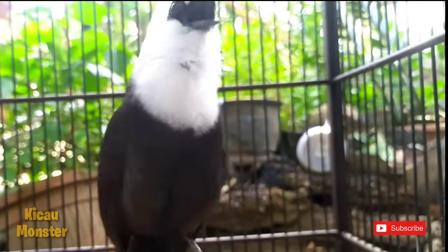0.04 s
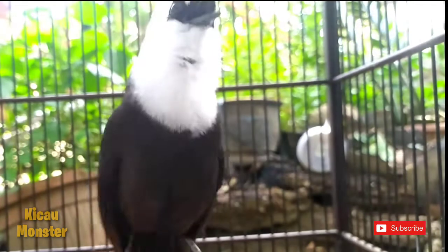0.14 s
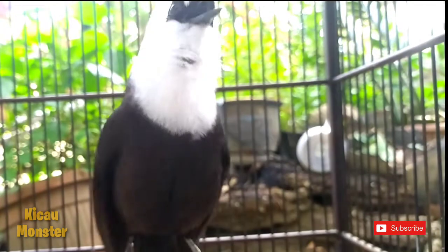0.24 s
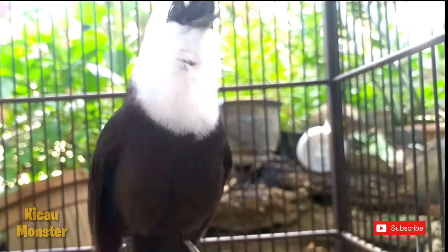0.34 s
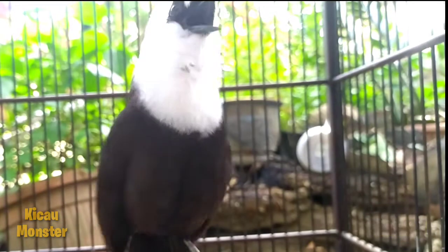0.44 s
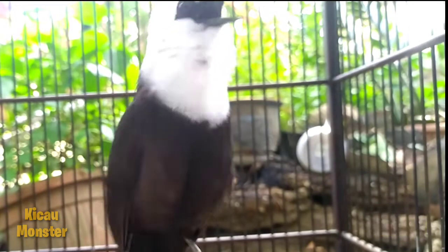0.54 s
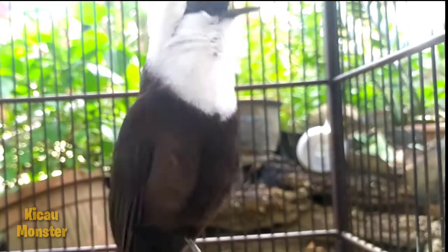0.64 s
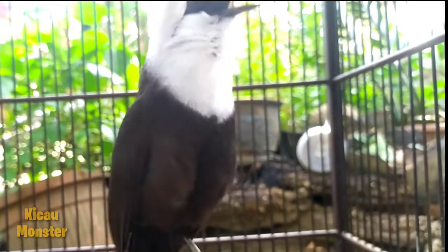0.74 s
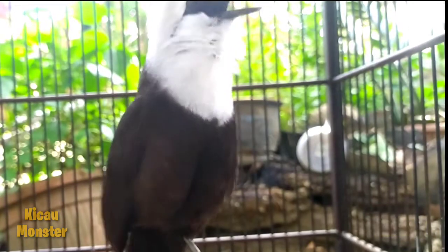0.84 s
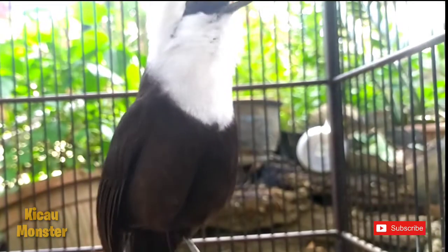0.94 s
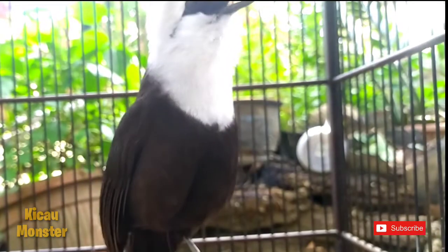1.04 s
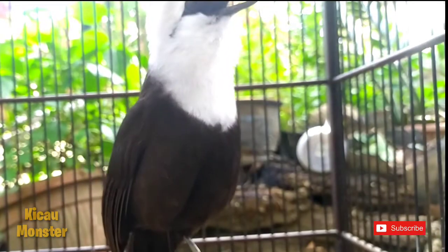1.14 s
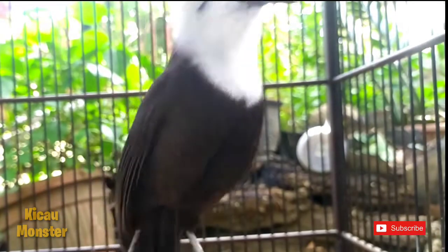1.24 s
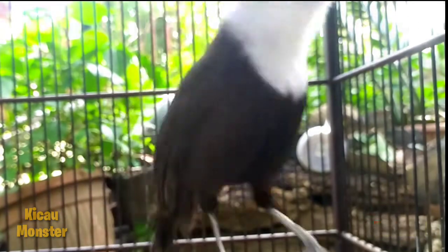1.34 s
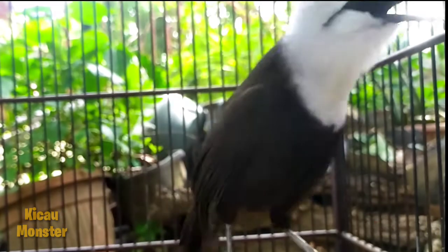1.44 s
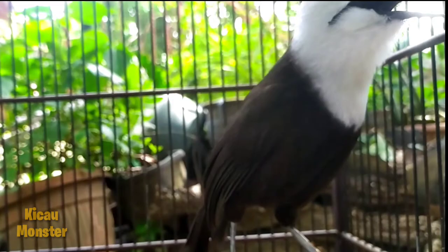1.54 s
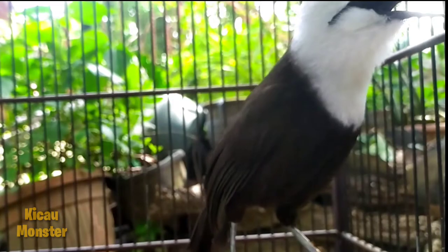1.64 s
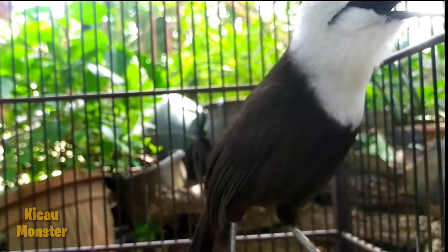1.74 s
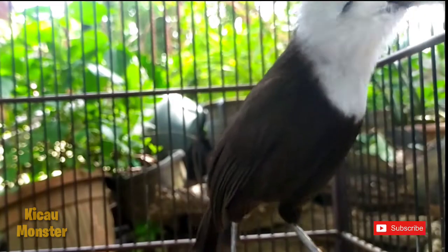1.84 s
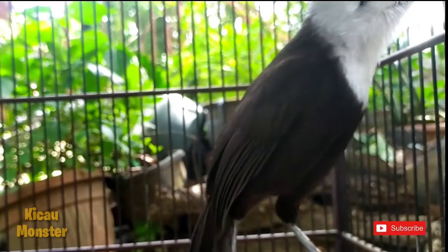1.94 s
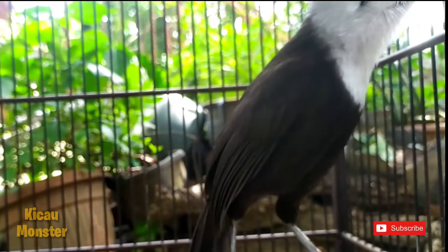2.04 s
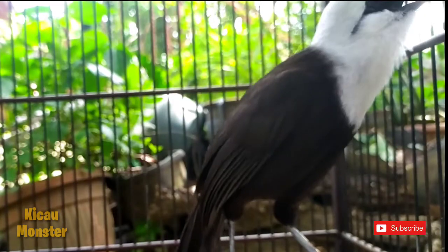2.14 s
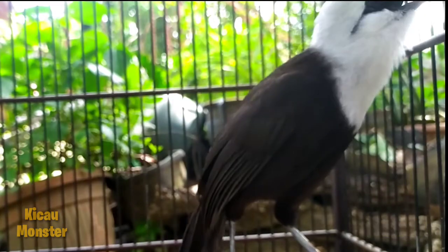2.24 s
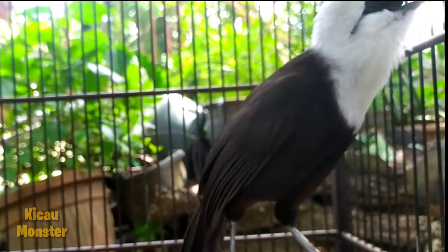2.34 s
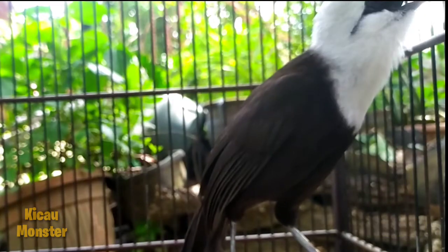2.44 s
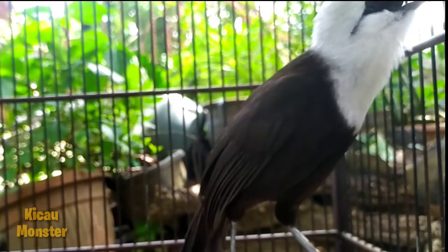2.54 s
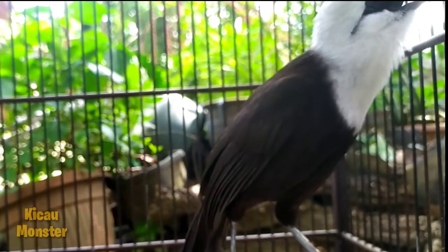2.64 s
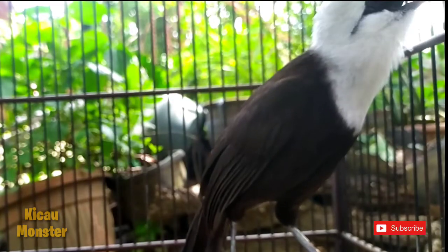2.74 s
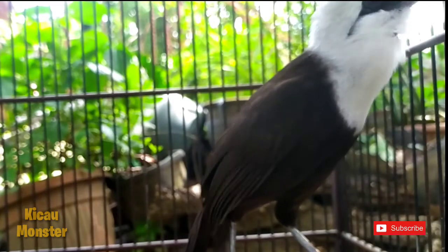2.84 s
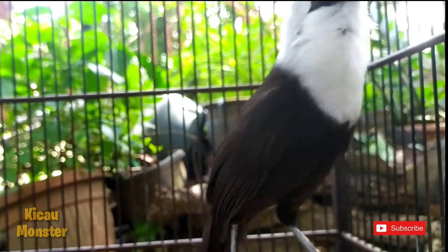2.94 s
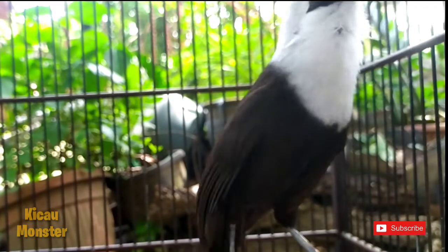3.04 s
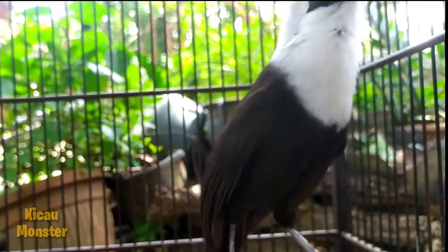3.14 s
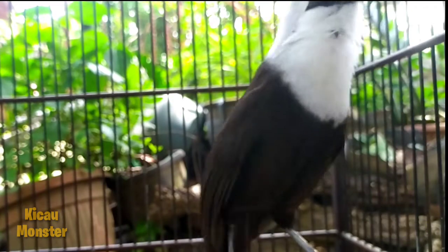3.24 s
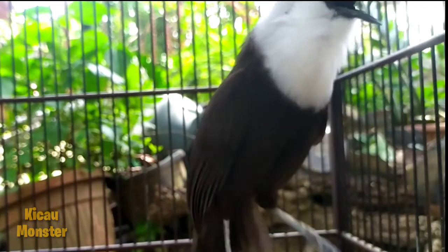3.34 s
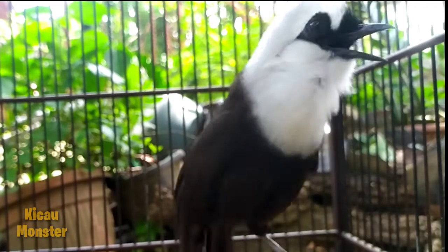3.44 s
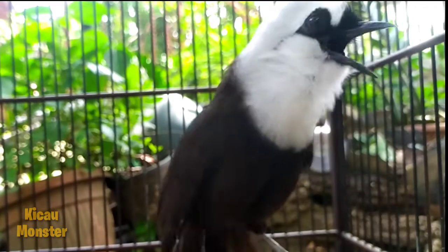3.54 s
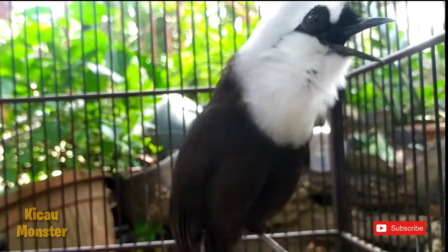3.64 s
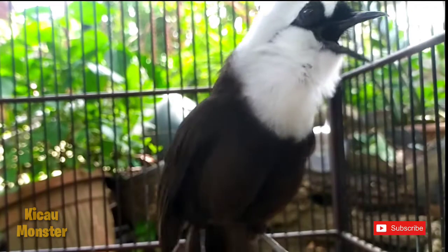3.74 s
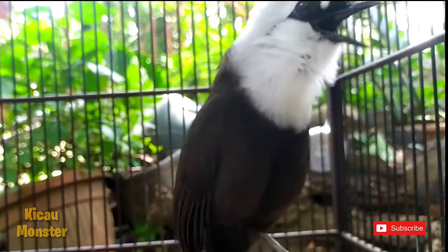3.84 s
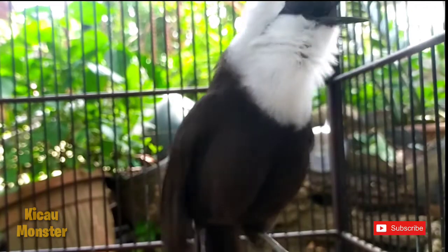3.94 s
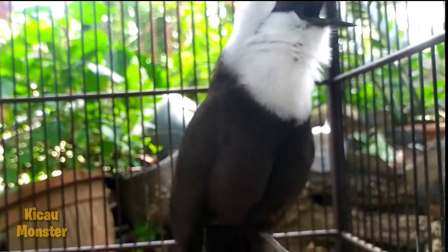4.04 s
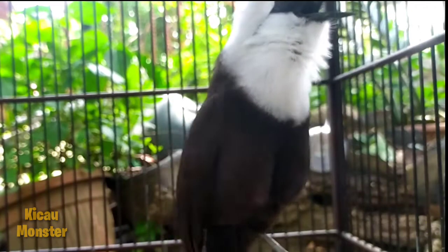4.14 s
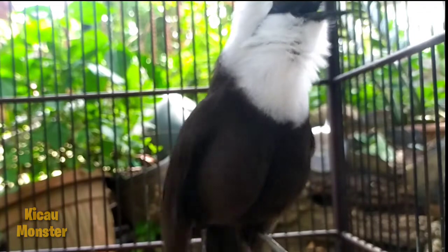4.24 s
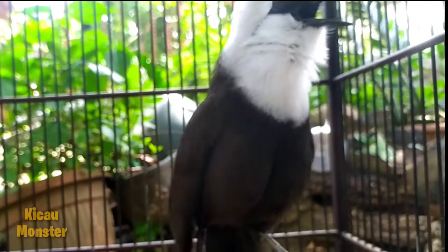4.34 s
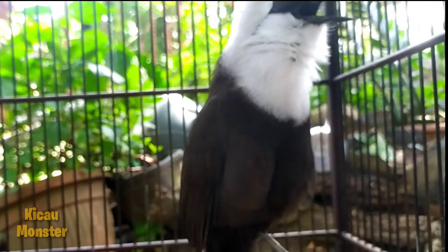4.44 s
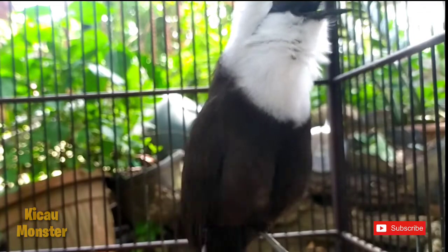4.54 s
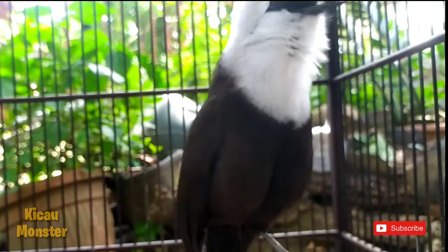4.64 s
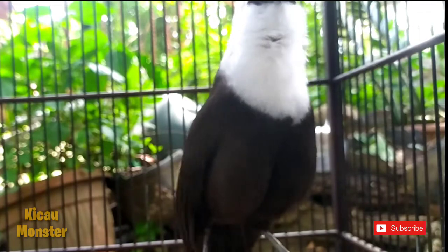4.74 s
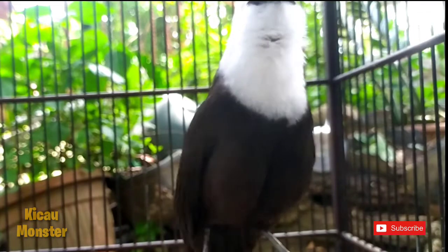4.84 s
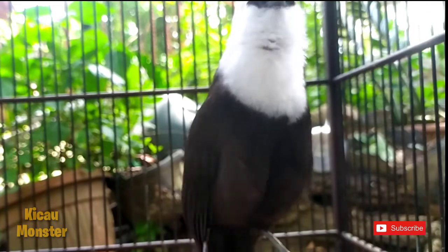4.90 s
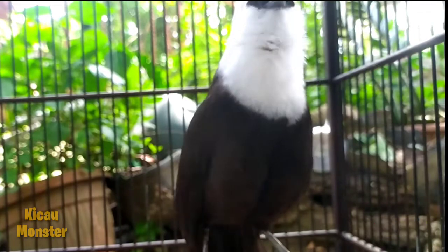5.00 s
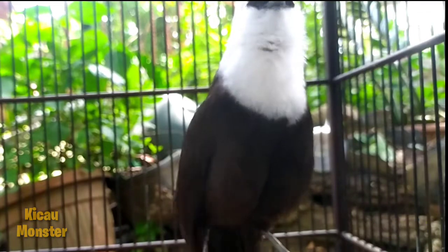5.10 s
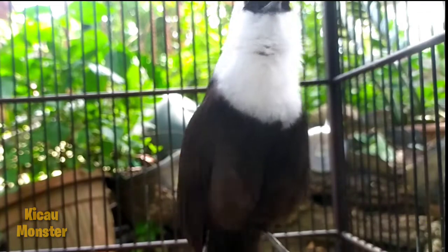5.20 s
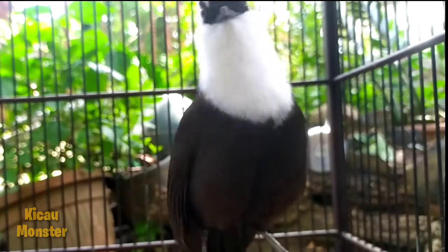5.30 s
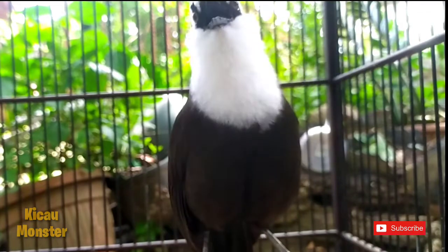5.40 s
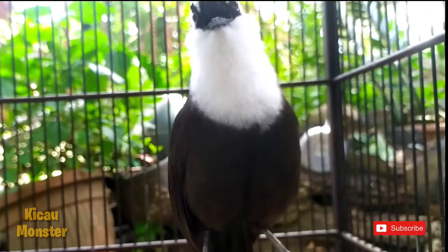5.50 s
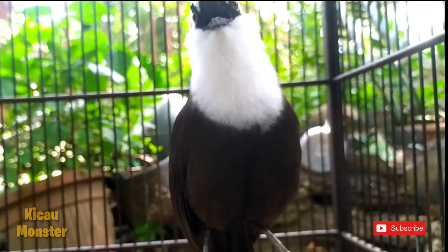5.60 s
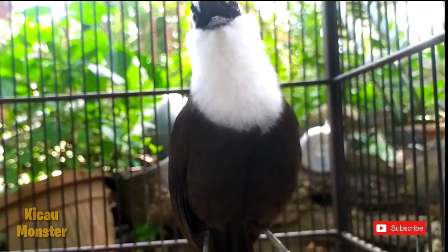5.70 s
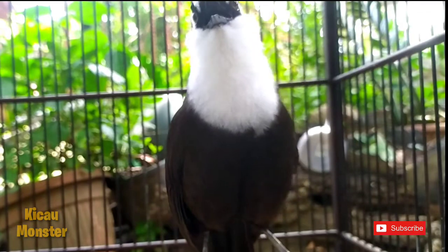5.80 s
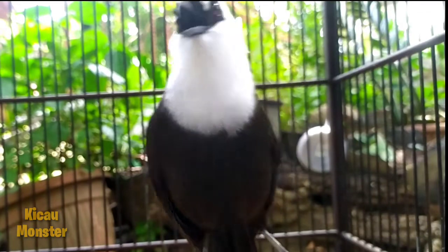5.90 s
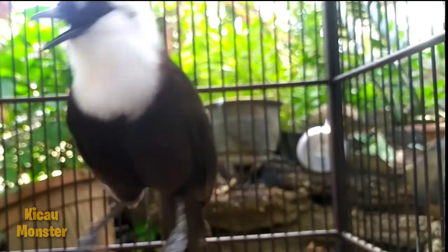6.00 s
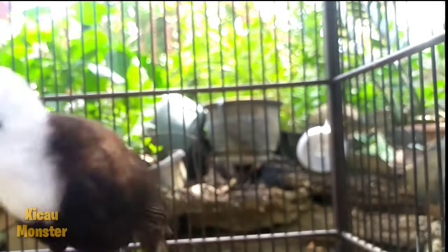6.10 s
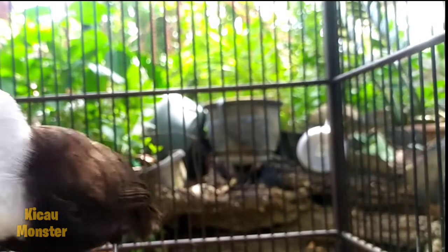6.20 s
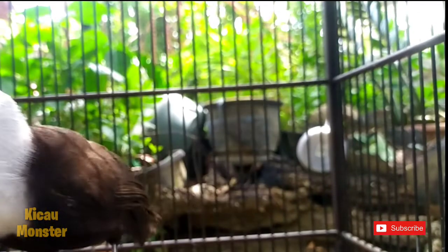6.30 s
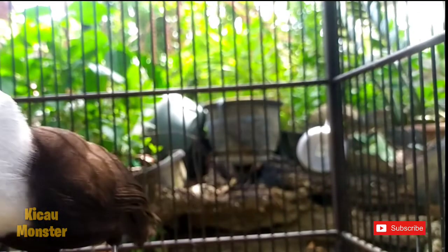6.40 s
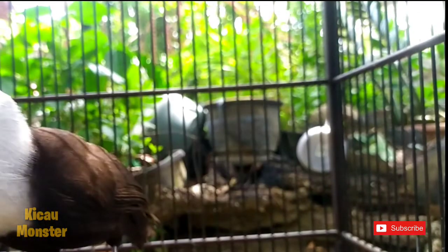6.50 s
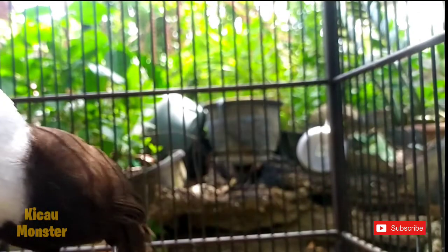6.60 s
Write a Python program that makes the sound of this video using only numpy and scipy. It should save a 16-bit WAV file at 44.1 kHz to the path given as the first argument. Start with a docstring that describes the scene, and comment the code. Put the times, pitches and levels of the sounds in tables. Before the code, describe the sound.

A caged songbird very close chatters in two loud, harsh rattling runs, with quiet chuckles between, faint garden birds behind, and a final hoarse squawk.

```python
"""In a garden, a caged laughingthrush chatters very close to two microphones: two rattling runs of harsh
arched notes, soft chuckles and a drawn-out note between them, and a squawk after claws tick on the perch.
Its voice is a stack of partials plus pulsed air noise, both coloured by how wide the beak opens. Cage bars,
near surfaces and walls ring after it. Smaller birds, as gliding tones, chirp and whistle farther off, over a
bed of coloured noise and a motor's hum. Loud notes overload the microphones and a limiter holds the peaks."""
import sys
import numpy as np
from scipy import signal
from scipy.fft import rfft, irfft, next_fast_len
from scipy.io import wavfile
from scipy.ndimage import uniform_filter1d, minimum_filter1d, map_coordinates

SR = 44100
rng = np.random.default_rng(int(sys.argv[2]) if len(sys.argv) > 2 else 0)


def wav_out(sig):
    """Save sig, one row per channel (or a flat mono array), as 16-bit PCM at SR to the path in sys.argv[1]."""
    wavfile.write(sys.argv[1], SR, np.round(np.clip(np.atleast_2d(sig).T, -1, 1) * 32767).astype(np.int16))


N = 293706
TIME = np.arange(N) / SR
TOP_HZ = 15500  # where the microphones' band ends

# thrush chatter, each note placed by the end of its attack: (time [s], level before the beak colour [dB])
CHATTER_NOTES = [(.013, 2), (.087, 2), (.166, 2.5), (.245, 1), (.336, 1), (.416, 1), (.498, .5), (.584, 0),
                 (.681, -.5), (.774, -1), (.897, -1), (2.508, -40), (2.564, -41), (2.617, -38),
                 (2.685, -36), (2.765, -41), (2.849, -38), (3.139, -7.5), (3.247, -4), (3.327, -3),
                 (3.392, -1.5), (3.459, -2), (3.527, -2), (3.598, -1.5), (3.666, -1), (3.736, 0),
                 (3.807, 0), (3.878, 0), (3.947, 0), (4.020, -.5), (4.092, .5), (4.165, 0), (4.239, .5),
                 (4.319, .5), (4.399, .5), (4.481, -.5), (4.567, .5), (4.656, .5), (4.748, .5), (4.849, .5),
                 (4.951, -.5), (5.067, -.5), (5.166, 0), (5.258, -1)]
# how the bird faces the microphones: (time [s], left lag [ms], left minus right [dB], treble gain [dB])
FACING = [(0, 0.12, 0.44, .5), (.9, 0.12, -2.3, 0), (2.85, 0.12, -3, 1), (2.9, 0.22, -7.5, -0.5),
          (3.15, 0.24, -3, 1.5), (3.6, .23, -3.2, 1.5), (4.3, .23, -6.5, 2), (4.8, .22, -5.3, -1),
          (5.3, .17, 4.5, -2.5), (6.62, -0.09, 2.5, -9.5)]
# partials of the call as heard, a dominant second harmonic with weaker ones above and below:
# (multiple of the pitch [-], level before the beak colour [dB])
PARTIALS = [(1, -22), (2, -1.5), (3, -25), (4, -21), (5, -25.5), (6, -16), (7, -21), (8, -25.5),
            (10, -23.5), (11, -29.5)]
# overall colour of the loud open-beaked notes, brightest near 1.9, 5.7 and 10 kHz:
# (frequency [Hz], gain [dB])
WIDE_COLOUR = [(100, -37.5), (450, -31), (900, -10), (1300, -11.5), (1850, -1.5), (2450, -3.5), (3100, -10),
               (4200, -21), (5650, -2.5), (6600, -11), (7600, -10), (8300, -19.5), (9400, -10), (10600, -5),
               (12200, -18.5), (14000, -14), (16000, -21)]
# overall colour of the notes with the beak half closed: (frequency [Hz], gain [dB])
NARROW_COLOUR = [(100, -44.5), (450, -20), (780, -1.5), (960, -5.5), (1250, -7), (1700, 1.5), (2400, -5),
                 (3200, -5.5), (4000, -20.5), (5500, -31.5), (6400, -2.5), (7300, 5.5), (8400, -19),
                 (11000, -8), (13800, -11.5), (16000, -18.5)]
# beak opening, half closed to wide open: (time [s], opening [0-1])
GAPE = [(.95, 1), (2.45, 0), (3.15, 0), (3.3, 0.2), (3.45, 1), (4.5, 0.98)]
# claws on the perch: (time [s], level before the click trim [dB])
CLAW_TICKS = [(2.3504, -39), (6.0292, -36.5), (6.1974, -28.5), (6.2432, -40)]
# colour of a claw tick: (frequency [Hz], relative level [dB per Hz])
CLAW_COLOUR = [(500, -17.5), (2500, -9), (9000, 3), (15000, -14)]
# a small bird's falling chips: (time [s], level before echoes [dB])
CHIPS = [(1.175, -50), (1.323, -50), (6.174, -54), (6.563, -51)]
# glide of one chip: (length [s], start [Hz], end [Hz])
CHIP_GLIDE = (.02, 4800, 2900)
# another bird's rising tweets: (time [s], level before echoes [dB])
TWEETS = [(2.104, -64), (2.208, -58), (2.291, -50.5), (2.428, -51), (2.580, -57)]
# glide of one tweet: (length [s], start [Hz], end [Hz])
TWEET_GLIDE = (.026, 3200, 5600)
# a thin high slur in two parts: (time [s], length [s], start [Hz], end [Hz], level before echoes [dB])
SLUR = [(5.47, .06, 7610, 6510, -51), (5.52, .06, 6110, 4300, -64)]
# far whistles: (time [s], length [s], start [Hz], end [Hz], level before flutter and mix [dB])
WHISTLES = [(1.25, .36, 3750, 3730, -70), (2.15, .25, 1531, 1313, -61), (6.16, .36, 1255, 1390, -51.5),
            (6.46, .14, 1415, 1404, -43.5)]
# what comes back through the foliage: (frequency [Hz], gain [dB])
LEAVES = [(500, 0), (1400, -6), (1720, -6), (1920, 0), (2800, -3), (4200, -3), (5700, 1), (8000, -1),
          (15000, -2)]
# decay of the walls' tail: (frequency [Hz], time to fall 60 dB [s])
WALL_DECAY = [(200, .4), (1500, .4), (1900, 0.51), (2400, 0.45), (4500, 0.55), (5700, .65), (7000, 0.55),
              (10500, 0.59), (16000, .35)]
# colour of the garden bed: (frequency [Hz], relative level [dB per Hz])
GARDEN_COLOUR = [(15, -53), (25, -27), (44, -8), (122, -4.5), (240, -15.5), (267, -20), (305, -17),
                 (378, -21.5), (666, -24.5), (741, -29), (871, -23), (1490, -30), (3720, -29),
                 (5580, -31.5), (15500, -42)]
# stereo likeness of the garden bed: (frequency [Hz], left-right correlation [-1 to 1])
GARDEN_LIKENESS = [(60, 0.64), (240, 0.95), (950, 0.29), (3770, -0.7), (15000, 0.25)]
# a far motor: (frequency [Hz], level [dB])
MOTOR_HUM = [(59, -63), (301, -67), (667, -74)]

# one chatter note
NOTE_HZ, USUAL_GAP_S = 956, .08  # base pitch of a full note at the usual tempo
TEMPO_OCT, TEMPO_RASP_DB = .125, 4  # a doubled tempo raises pitch and rasp by this much
SOFT_OCT_PER_DB = .0012  # soft notes are sung lower
ATTACK_S, HOLD_S, RELEASE_S = .012, .026, .0205  # air pressure of one note
CREST_S, FLICK_S = .02, .0035  # time from end of attack to the top of the pitch arch, and half its width
RISE_OCT, FLICK_OCT, FALL_OCT_PER_S = .1, .105, 25  # slow climb, flick at the crest, dive
CLEAN_DB, BREAK_DB, CREST_DIP_DB = -5.5, 7, 3.5  # rasp of the climb, its jump at the crest, level lost there
# air pressure in every call
FADE_DB, RELEASE_BEND = 40, .95  # depth of attack and release; curve of the release
SLUMP_OCT_PER_DB, RASP_PER_DB = .011, .53  # as the pressure fails, the voice goes flat and hoarse
MOST_RASP_DB = 14  # the most hoarseness that failing pressure adds


def thrush(edge_hz=3500):
    """The bird's treble follows where its beak points."""
    voice = syrinx()
    treble = filtered(voice, lambda hz: 1 - 1 / (1 + (hz / edge_hz) ** 6))
    treble_db = curves(FACING, TIME)[2]
    return voice + (amp(treble_db) - 1) * treble


def syrinx(jitter=.02, shimmer=.15, air_db=-18, grain_db=2, flutter_db=4.2):
    """Harmonics and turbulent air, coloured by the beak; harsh moments also shake pitch and level."""
    pitch, level_db, rasp_db = phrases()
    gape = curves(GAPE, TIME)[0]
    rough = amp(rasp_db / 2)
    shaken_pitch = pitch * (1 + jitter * rough * wobble(1400, N))
    phase = 2 * np.pi * np.cumsum(shaken_pitch) / SR

    partials = [amp(db) * beak_colour(k * pitch, gape) * np.sin(k * phase) for k, db in PARTIALS]
    flutter = unit(amp(flutter_db * wobble(600, N)))
    tone = sum(partials[:2]) + sum(partials[2:]) * flutter  # the upper partials come and go
    tone = np.sqrt(2) * tone * (1 + shimmer * rough * wobble(800, N))

    air = np.sqrt(gape) * noise(WIDE_COLOUR) + np.sqrt(1 - gape) * noise(NARROW_COLOUR)
    # air passes once a cycle, in uneven bursts
    puffs = unit((1 + .35 * np.cos(phase)) * amp(grain_db * wobble(450, N)))
    return amp(level_db) * (tone + amp(air_db + rasp_db) * puffs * air)


def beak_colour(hz, gape):
    """Gain of the call's colour between beak half closed (0) and wide open (1)."""
    return amp(gape * along(WIDE_COLOUR, hz) + (1 - gape) * along(NARROW_COLOUR, hz))


def phrases():
    """Pitch [Hz], level [dB] and rasp [dB] at every sample; where calls overlap the louder takes over."""
    controls = np.tile([[900.], [-120.], [0.]], N)  # silent between calls
    for rows in chatter() + [drawl(), squawk()]:
        span = slice(*np.searchsorted(TIME, rows[[0, -1], 0]))
        call = np.array(curves(rows, TIME[span]))
        louder = call[1] > controls[1, span]
        controls[:, span] = np.where(louder, call, controls[:, span])
    return controls


def chatter(vary=.2, vary_db=1.2, drift_oct=.016):
    """Each note climbs cleanly, flicks up, breaks and dives; quick ones are higher and harsher, soft arch less."""
    gaps = np.diff([s for s, db in CHATTER_NOTES])
    nearest_gap = np.minimum(np.r_[gaps[0], gaps], np.r_[gaps, gaps[-1]])
    tempos = np.log2(USUAL_GAP_S / nearest_gap)  # in doublings

    t, pressure_db = push(ATTACK_S, HOLD_S, RELEASE_S)
    flick = np.exp(-((t - CREST_S) / FLICK_S) ** 2)
    broken = np.where(t < CREST_S, flick, 1)
    climb = RISE_OCT * (np.clip(t / CREST_S, 0, 1) - .5)
    dive = FALL_OCT_PER_S * np.maximum(t - CREST_S, 0)
    arch = climb + FLICK_OCT * flick - dive

    calls = []
    for (s, db), tempo in zip(CHATTER_NOTES, tempos):
        bend, grit, drift = (wobble(160, len(t)) for _ in range(3))
        depth = np.interp(db, [-30, -6], [.7, 1]) * (1 + vary * bend)
        octaves = TEMPO_OCT * tempo + SOFT_OCT_PER_DB * db + depth * arch + drift_oct * drift
        rasp_db = CLEAN_DB + TEMPO_RASP_DB * tempo + BREAK_DB * broken + vary_db * grit
        level_db = db - CREST_DIP_DB * flick
        calls.append(voiced(s + t, pressure_db, NOTE_HZ * 2 ** octaves, level_db, rasp_db))
    return calls


def drawl(s=2.913, hz=832, db=-12, attack=.034, hold=.11, release=.021,
          sag_db=4.5, sag_oct=.105, rasp_db=-3, break_db=5, swell_db=3):
    """One long note that sags in the middle, then swells and turns hoarse."""
    t, pressure_db = push(attack, hold, release)
    u = np.clip(t / hold, 0, 1)
    sag = 1 - np.cos(np.pi * u) ** 6
    level_db = db + swell_db * u - sag_db * sag
    hoarse_db = rasp_db + sag_db * sag / 2 + break_db * u ** 6
    return voiced(s + t, pressure_db, hz * 2 ** (-sag_oct * sag), level_db, hoarse_db)


def squawk(s=6.622, hz=570, db=-11, attack=.025, hold=.015, release=.03, rasp_db=11.5, lurch_oct=.18):
    """A short, very hoarse cry whose pitch lurches about."""
    t, pressure_db = push(attack, hold, release)
    lurching_hz = hz * 2 ** (lurch_oct * wobble(130, len(t)))
    return voiced(s + t, pressure_db, lurching_hz, db, rasp_db)


def push(attack, hold, release):
    """One push of air: time from the end of the attack [s], and pressure [dB]."""
    t = np.arange(-attack, hold + release, 1 / SR)
    rising = np.maximum(-t / attack, 0)
    falling = np.maximum((t - hold) / release, 0) ** RELEASE_BEND
    return t, -FADE_DB * (rising + falling)


def voiced(s, pressure_db, hz, db, rasp_db):
    """Pressure sets level, pitch and hoarseness; columns (time [s], pitch [Hz], level [dB], rasp [dB])."""
    hoarse_db = np.minimum(-RASP_PER_DB * pressure_db, MOST_RASP_DB)
    slumped_hz = hz * 2 ** (SLUMP_OCT_PER_DB * pressure_db)
    return np.column_stack([s, slumped_hz, db + pressure_db, rasp_db + hoarse_db])


def at_ports(x):
    """The near bird reaches the two microphones at different times and levels."""
    lag_ms, tilt_db, _ = curves(FACING, TIME)
    lag = lag_ms * SR / 1000  # in samples
    return np.array([amp(side * tilt_db / 2) * map_coordinates(x, [np.arange(N) - side * lag / 2])
                     for side in (1, -1)])


def bars(x, edge_hz=4500, spread=.004, count=8):
    """The cage bars throw the treble back within a few milliseconds, differently to each microphone."""
    delays = rng.uniform(0, spread, (2, count))
    signs = rng.choice([-1, 1], (2, count))
    taps = np.array([np.bincount((d * SR).astype(int), g, SR // 10) for d, g in zip(delays, signs)])
    highpass = signal.butter(N=2, Wn=edge_hz, btype="high", fs=SR, output="sos")
    treble = signal.sosfilt(highpass, x)
    return signal.fftconvolve(treble[None], taps / np.sqrt(count), axes=1)[:, :N]


def nearby(x, t60):
    """Quick scattered echoes from cage, pots and ground."""
    t = np.arange(SR // 5) / SR
    echoes = rng.standard_normal((2, len(t))) * amp(-60 * t / t60) * (1 - np.exp(-t / .0066))
    return signal.fftconvolve(x[None], echoes / np.linalg.norm(echoes[0]), axes=1)[:, :N]


def walls(x, gap=.013):
    """A diffuse tail in which each frequency dies at its own speed; gap [s] sets its soft onset."""
    hz, t, z = signal.stft(rng.standard_normal((2, SR)), SR, nperseg=256)
    decay = amp(-60 * t / along(WALL_DECAY, hz)[:, None])
    tail = signal.istft(z * decay * (1 - np.exp(-t / gap)), SR, nperseg=256)[1]
    return signal.fftconvolve(x[None], tail / np.linalg.norm(tail[0]), axes=1)[:, :N]


def claws(t60=.01, click_db=-8):
    """Short dry ticks on the perch: bursts of coloured noise that die at once."""
    strength, t = np.zeros(N), np.arange(SR // 10) / SR
    for s, db in CLAW_TICKS:
        add(strength, s, amp(db + click_db - 60 * t / t60))
    return strength * noise(CLAW_COLOUR)


def glides(rows, waver, overtone_db):
    """Gliding bird tones with two overtones; a fast waver makes them buzzy."""
    out = np.zeros(N)
    for s, length, start_hz, end_hz, db in rows:
        u = np.linspace(0, 1, int(length * SR))
        hz = (start_hz + (end_hz - start_hz) * u) * (1 + waver * wobble(1500, len(u)))
        phase = 2 * np.pi * np.cumsum(hz) / SR
        tone = sum(amp(k * overtone_db) * np.sin((k + 1) * phase) for k in range(3))
        swell = np.sqrt(8 * u * (1 - u))
        add(out, s, amp(db) * swell * tone)
    return out


def garden(floor_db=-53):
    """A low town rumble and faint hiss, mixed from mid and side noise, with a motor's wavering hum."""
    def turn(hz):
        return np.arccos(np.clip(along(GARDEN_LIKENESS, hz), -1, 1)) / 2

    mid = filtered(noise(GARDEN_COLOUR), lambda hz: np.cos(turn(hz)))
    side = filtered(noise(GARDEN_COLOUR), lambda hz: np.sin(turn(hz)))
    bed = unit(np.array([mid + side, mid - side]))
    hum = sum(amp(db) * np.sqrt(2) * np.sin(2 * np.pi * hz * TIME + 1.4 * wobble(12, N))
              for hz, db in MOTOR_HUM)
    return amp(floor_db + .8 * wobble(3.3, N)) * bed + hum


def amp(db):
    """Decibels to gain."""
    return 10 ** (np.asarray(db) / 20)


def unit(x):
    """x at rms 1."""
    return x / np.sqrt(np.mean(x ** 2) + 1e-20)


def along(points, hz):
    """(frequency [Hz], value) points read on a log frequency axis."""
    f, v = np.transpose(points)
    return np.interp(np.log(hz + 1), np.log(f + 1), v)


def curves(rows, at):
    """Each column after the first, read at the given times."""
    s, *cols = np.transpose(rows)
    return [np.interp(at, s, c) for c in cols]


def wobble(rate, size):
    """A smooth random curve, rate knots a second."""
    knots = rng.standard_normal(SR // 2)
    return map_coordinates(knots, [np.arange(size) * rate / SR], mode="wrap")


def filtered(x, response):
    """x times a response of frequency."""
    m = next_fast_len(N + SR // 2)
    return irfft(rfft(x, m) * response(np.fft.rfftfreq(m, 1 / SR)), m)[..., :N]


def noise(spectrum):
    """Coloured noise of rms 1."""
    return unit(filtered(rng.standard_normal(N), lambda hz: amp(along(spectrum, hz))))


def add(track, s, x):
    """Mix x into the track at time s."""
    i = int(np.clip(round(s * SR), 0, N - 1))
    track[i:i + len(x)] += x[:N - i]


def scene():
    """The near thrush with its echoes, its claws, the other birds and the garden."""
    bird = thrush()
    distant = filtered(bird, lambda hz: amp(along(LEAVES, hz)))
    near = at_ports(bird) + amp(-8.5) * bars(bird)
    near = near + amp(-11) * nearby(bird, t60=.042) + amp(-20.5) * walls(distant)

    ticks = claws()
    perch = ticks + amp(3.5) * nearby(ticks, t60=.12)

    chips = glides([(s, *CHIP_GLIDE, db) for s, db in CHIPS], waver=.07, overtone_db=-9)
    tweet_rows = [(s, *TWEET_GLIDE, db) for s, db in TWEETS]
    tweets = glides(tweet_rows + list(SLUR), waver=.07, overtone_db=-20)
    small = chips + tweets  # heard only through their echoes
    far = glides(WHISTLES, waver=.008, overtone_db=-31) * amp(2.5 * wobble(110, N))  # the whistles flutter
    others = amp(7) * nearby(small, t60=.089) + walls(small) + amp(-5) * far + amp(-1) * walls(far)
    return near + perch + others + garden()


def record(dry, overload_db=-1.04, ceiling_db=-2.35, hardness=8, hold=.002):
    """The microphones clip on loud notes, a fast limiter holds the peaks, and the band ends steeply."""
    x = dry / (1 + np.abs(dry / amp(overload_db)) ** hardness) ** (1 / hardness)
    size = int(hold * SR)
    crest = np.sqrt(2 * np.abs(uniform_filter1d(x ** 2, size, axis=1)))
    wanted_gain = 1 / np.maximum(crest / amp(ceiling_db), 1)
    gain = uniform_filter1d(minimum_filter1d(wanted_gain, size, axis=1), size, axis=1)
    return filtered(x * gain, lambda hz: hz < TOP_HZ)


dry = scene()
out = record(dry)
wav_out(out)
```